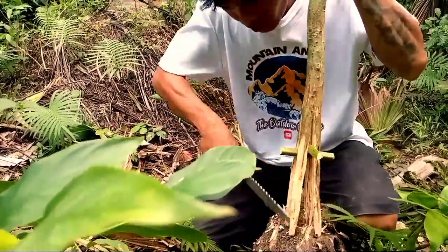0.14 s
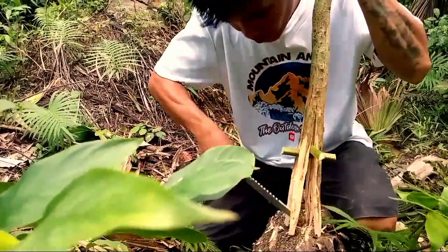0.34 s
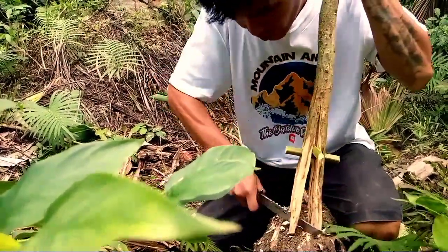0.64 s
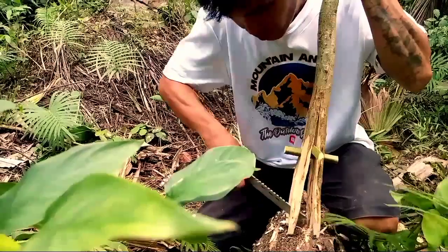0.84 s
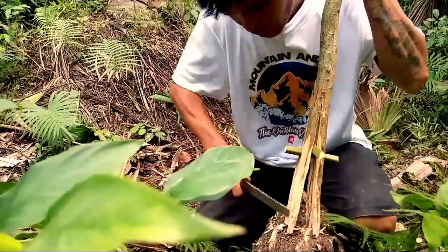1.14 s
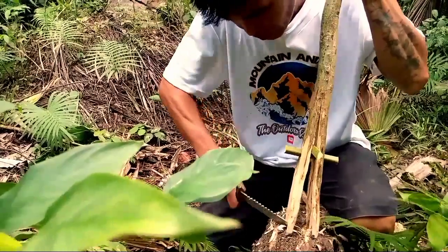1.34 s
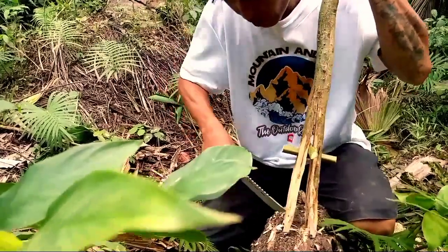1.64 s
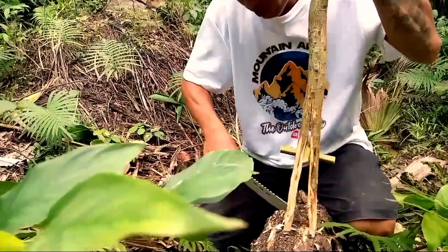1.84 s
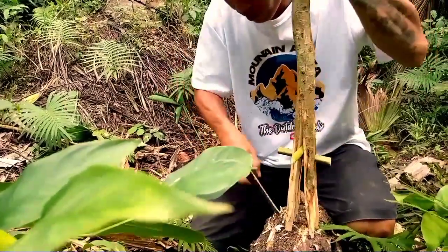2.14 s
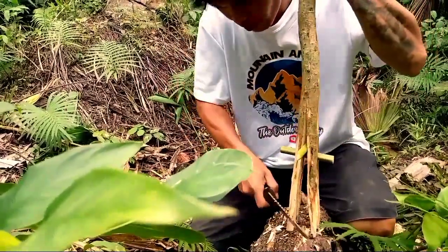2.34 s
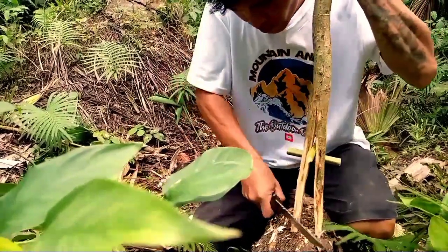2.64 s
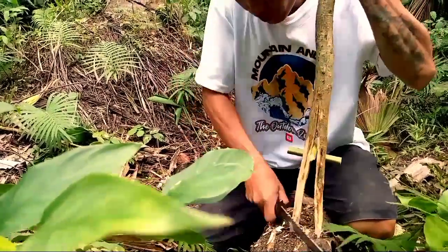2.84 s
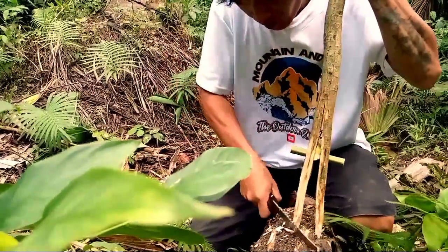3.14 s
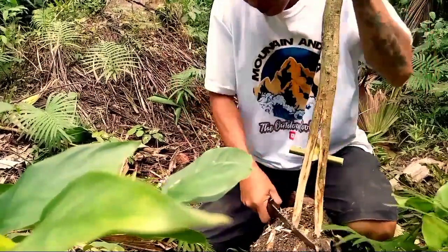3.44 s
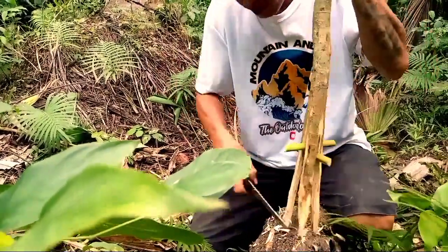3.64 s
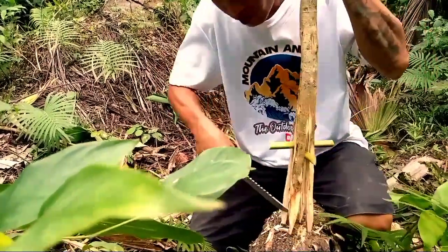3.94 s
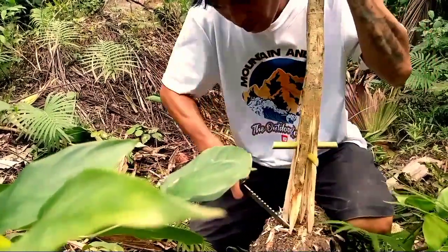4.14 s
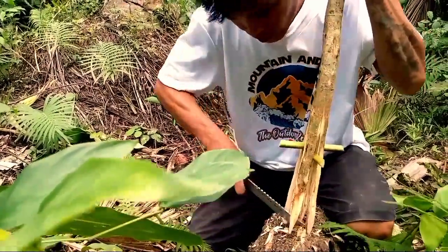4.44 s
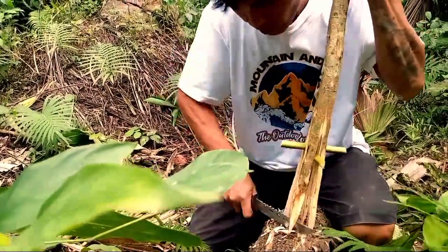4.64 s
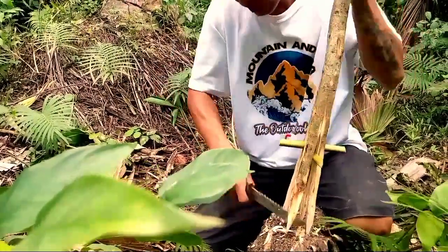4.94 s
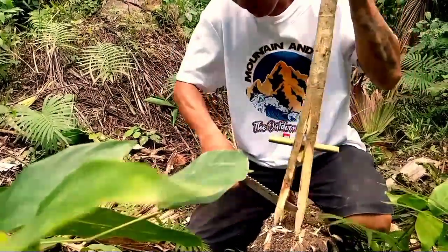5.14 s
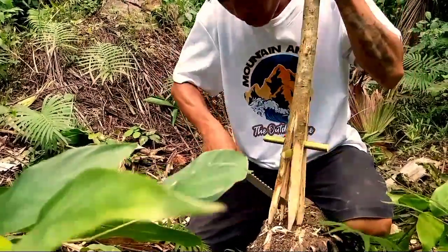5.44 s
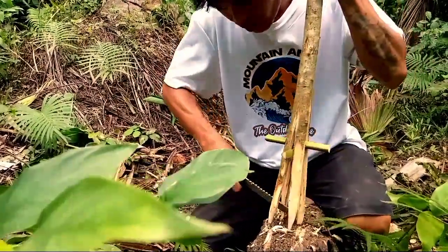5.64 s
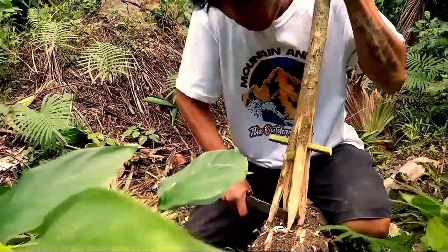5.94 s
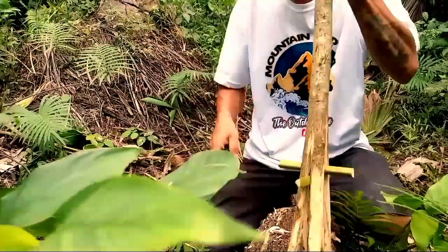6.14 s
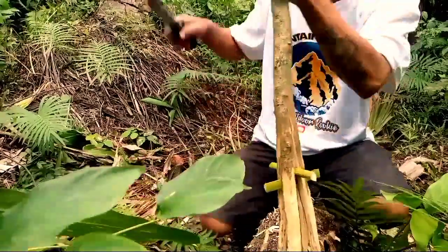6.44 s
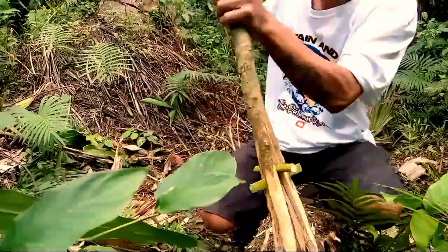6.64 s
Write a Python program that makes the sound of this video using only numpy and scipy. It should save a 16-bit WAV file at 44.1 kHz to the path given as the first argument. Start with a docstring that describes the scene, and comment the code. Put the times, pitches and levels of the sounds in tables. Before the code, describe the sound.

A quiet forest bed of soft, even hiss with a faint, wavering low drone runs for nearly seven seconds. Close by, a knife works a split cane pole. A dull, weak knock comes at 0.2 s, then a scrape and a dry snap at 0.6. A bright steel clink and crack follow at 0.95, and the strongest cluster, a hard crack with clink and hollow knock, at 1.34. A crisp snap lands at 1.93, a crackling slip at 2.74, and a double metallic clink at 3.15. A quieter stretch holds light scraping and tiny ticks, with a soft rustle at 4.1 and a muted knock at 4.57. A very sharp bare snap cuts in at 5.07; a clinking crack with a woody thump follows at 5.85. From 6.3 a brief leaf swish gives way to low wind rumble and buffets, with a last small snap at 6.76.

```python
"""A knife is worked between the split prongs of a bamboo pole by a kneeling man in a quiet forest.
Noisy scrapes swell until the edge slips: dying sines make the steel clink, short noise bursts crack and
snap the cane, and low hollow modes knock as the pole is jolted on its stump. Faint random ticks, a short
echo and soft swishes of leaves and soil surround the work. Behind lie shaped-noise forest hiss and a
wavering narrow-band drone; at the end low noise and short sine pulses buffet the microphone."""
import sys
import numpy as np
from scipy import signal
from scipy.fft import rfft, irfft
from scipy.io import wavfile
from scipy.ndimage import uniform_filter1d

SR = 44100
rng = np.random.default_rng(int(sys.argv[2]) if len(sys.argv) > 2 else 0)


def materialize(psi):
    """Save the field psi as 16-bit PCM at rate SR to the path in sys.argv[1].

    A 1-D psi becomes a single channel; in a 2-D psi each row is a channel.
    """
    bounded = np.clip(np.atleast_2d(psi).T, -1, 1)
    quanta = np.round(bounded * 32767).astype(np.int16)
    wavfile.write(sys.argv[1], SR, quanta)


N = 299439
TIME = np.arange(N) / SR


def amp(db):
    """Decibels to gain."""
    return 10 ** (np.asarray(db) / 20)


def unit(x):
    """Scales to an rms of one."""
    return x / np.sqrt(np.mean(x ** 2) + 1e-20)


def read(points, hz):
    """A spectrum in dB, joined by straight lines over log frequency."""
    point_hz, point_db = np.transpose(points)
    return np.interp(np.log(hz + 1), np.log(point_hz), point_db)


def add(mix, start_s, sound):
    """Mixes a sound in at a time, cut off at the end of the scene."""
    part = mix[max(round(start_s * SR), 0):][:len(sound)]
    part += sound[:len(part)]


def colour(x, gain):
    """Filters by a gain given as a function of frequency."""
    return irfft(rfft(x) * gain(np.fft.rfftfreq(len(x), 1 / SR)), len(x))


def drift(rate_hz):
    """Slow random motion of unit rms: noise rolled off smoothly around a rate."""
    return unit(colour(rng.standard_normal(N), lambda hz: np.exp(-(hz / rate_hz) ** 2)))


# Spectral shape of the foliage hiss. Each row: frequency in Hz, relative density in dB per Hz.
FOREST_SHAPE = [(20, -40), (30, -28), (45, -18), (85, 0.5), (130, 3.5), (280, 4), (500, -0.5), (1200, 0),
                (3000, -3), (6700, -4.5), (8100, -12), (9700, -5), (11800, -16), (13900, -24), (15100, -10)]


def forest(start_db=-58, swell_db_per_s=0.2264, flutter_db=0.75, patchy_db=1.23, top_hz=15550):
    """The even hiss of distant foliage: shaped noise that grows very slowly and flutters in drifting patches."""
    hz, _, bins = signal.stft(rng.standard_normal(N), SR, nperseg=2048)
    patches = uniform_filter1d(rng.standard_normal(bins.shape), size=14, axis=0)  # smooth over frequency
    patches = unit(uniform_filter1d(patches, size=3, axis=1))  # and over time
    ceiling = np.clip((top_hz - hz) / 100, 0, 1)
    bins = bins * ceiling[:, None] * amp(read(FOREST_SHAPE, hz)[:, None] + patchy_db * patches)
    hiss = unit(signal.istft(bins, nperseg=2048)[1][:N])
    return hiss * amp(start_db + swell_db_per_s * TIME + flutter_db * drift(16))


# Slow course of the drone. Each row: time in seconds, level in dB before trim and surges.
DRONE_LEVEL = [(0, -65), (1.85, -64), (2.15, -69.5), (2.7, -62), (4.5, -71), (4.72, -61), (6.79, -65)]
# Brief surges of the drone. Each row: centre in seconds, added level in dB.
DRONE_SURGES = [(.22, 7.5), (.97, 10.5), (1.85, 6.5), (3.25, 6.5), (5.33, 3.5)]


def drone(centre_hz=203, width_hz=29, trim_db=.3, envelope_power=1.2, surge_s=0.054):
    """A far, low drone: narrow-band noise wavers in pitch and strength, with a few brief surges."""
    noise = rng.standard_normal(N)
    narrow = colour(noise, lambda hz: 1 / (1 + ((hz - centre_hz) / width_hz) ** 2) ** 2)
    band = signal.hilbert(narrow)
    # a power above one exaggerates the natural swells of the band
    tone = unit(band.real * (abs(band) + 1e-9) ** (envelope_power - 1))
    surge_db = sum(db * np.exp(-((TIME - s) / surge_s) ** 2) for s, db in DRONE_SURGES)
    slow_db = np.interp(TIME, *np.transpose(DRONE_LEVEL))
    return amp(trim_db + surge_db + slow_db) * tone


def ring(modes, rise_s=0.00013, bend=0, bend_s=0.0075, scatter=0, size=8192):
    """Dying sines (Hz, dB, t60) that may start sharp or out of step; the grip shifts each slightly per blow."""
    t = np.arange(size) / SR
    bent_t = t + bend * bend_s * (1 - np.exp(-t / bend_s))  # pitch starts sharp by the share "bend"
    out = np.zeros(size)
    for hz, db, t60 in modes:
        blow_hz = hz * (1 + 0.001 * rng.standard_normal())
        cycles = blow_hz * bent_t + scatter * rng.random()
        out += amp(db - 60 * t / t60) * np.sin(2 * np.pi * cycles)
    return out * (1 - np.exp(-t / rise_s))


# Modes of the hollow pole. Each row: frequency in Hz before the grip, relative level in dB, t60 in seconds.
POLE_MODES = [(199, -26, 0.062), (288, -5.5, 0.057), (396, -0.5, 0.064), (460, -9, .045), (800, -1, 0.03),
              (1097, -0.5, 0.022), (1396, -3, .026), (2060, -11, 0.035)]
# Jolts of the pole on its stump. Each row: start in seconds, level in dB before the trim,
# brightness in dB per octave, factor on the mode frequencies from the grip.
POLE_KNOCKS = [(.197, -61, -13, 1), (.615, -57.5, -7, 1.4), (0.9455, -49.5, -1.5, .95),
               (1.3395, -39, 1.5, 1.03), (2.744, -50, 0, 1.12), (4.57, -51, -5, .98),
               (5.85, -41.5, -5.5, 1.09)]


def pole(trim_db=1, lowest_hz=110):
    """Short hollow knocks: brightness tilts the modes about 600 Hz, and the thin pole radiates no deep bass."""
    out = np.zeros(N)
    for s, db, tilt_db, grip in POLE_KNOCKS:
        modes = [(hz * grip, mode_db + tilt_db * np.log2(hz / 600), t60) for hz, mode_db, t60 in POLE_MODES]
        add(out, s, amp(db + trim_db) * ring(modes, rise_s=.0006, scatter=0.94))
    return colour(out, lambda hz: hz ** 2 / (hz ** 2 + lowest_hz ** 2))


# Colour of cracking bamboo before tilt and splinter. Each row: frequency in Hz, relative level in dB.
CRACK_COLOUR = [(60, -33), (300, -21), (900, -17), (1800, -9), (2800, -5.5), (4100, -4.5), (5000, -4.5),
                (6400, -0.5), (7900, -8.5), (9600, -1.5), (11000, -3), (12200, -14), (14000, -6.5),
                (15200, -6.5), (15800, -24)]


def cane(x, tilt_db, splinter_hz, splinter_db=11, width_hz=230, size=1024):
    """The causal colour of cracking bamboo, tilted about 5 kHz, with the resonance of the loosened splinter."""
    hz = abs(np.fft.fftfreq(size, 1 / SR))
    peak_db = splinter_db / (1 + ((hz - splinter_hz) / width_hz) ** 2)
    slope_db = tilt_db * np.log2(np.clip(hz, 1200, 15000) / 5000)
    gain = amp(read(CRACK_COLOUR, hz) + slope_db + peak_db)
    # minimum phase: the energy comes as early as the spectrum allows
    spectrum = np.exp(signal.hilbert(np.log(unit(gain))).conj())
    taps = np.fft.ifft(spectrum).real
    return signal.fftconvolve(x, taps[:size // 2])[:len(x)]


def crack(db, tilt_db, splinter_hz, click=4.46, tear_db=-19, tear_t60=0.061, size=4096):
    """One sharp break, then a quickly thinning noise spray of tearing fibres."""
    t = np.arange(size) / SR
    t60 = 0.023 * np.exp(-0.03 * tilt_db)  # the brighter a crack, the sooner it is over
    spray = rng.standard_normal(size) * (amp(-60 * t / t60) + amp(tear_db - 60 * t / tear_t60))
    spray[0] = click
    return amp(db) * cane(spray, tilt_db, splinter_hz)


def ticks(per_s=3, tick_db=-60, spread_db=2, tilt_db=-2, splinter_hz=5500):
    """The strained cane ticks faintly at random: small cracks of uneven level, splinter within an octave."""
    out = np.zeros(N)
    draws = rng.random((40, 3))
    starts = np.cumsum(-np.log(1 - draws[:, 0]) / per_s)
    for s, (_, strength, pitch) in zip(starts, draws):
        db = tick_db + spread_db * (2 * strength - 1)
        add(out, s, crack(db, tilt_db, splinter_hz * 2 ** (2 * pitch - 1)))
    return out


# Pushes of the edge along the cane. Each row: slip in seconds, level there in dB before the trim,
# build-up time constant in seconds.
SCRAPE_STROKES = [(.612, -56, .03), (1.335, -63.5, 0.51), (2.74, -51, 0.035), (3.17, -54.5, 0.13),
                  (3.6, -59.5, 0.11), (4.58, -55.5, 0.083), (5.075, -57, 0.097), (5.35, -63, 0.089),
                  (5.87, -56.5, 0.12), (6.36, -63.5, 0.23)]


def scrape(grains_per_s=3000, spread_db=-2.0, tilt_db=-2, trim_db=-1, let_go_s=0.031):
    """The edge catches on many tiny fibres of uneven size, louder until it slips, then dying away."""
    catches = rng.random(N) < grains_per_s / SR
    unevenness = amp(spread_db * np.minimum(rng.exponential(1, N), 5))
    grains = catches * rng.standard_normal(N) * unevenness
    pressure = np.zeros(N)
    for s, db, build_s in SCRAPE_STROKES:
        pressure += amp(db) * np.exp(-np.maximum((s - TIME) / build_s, (TIME - s) / let_go_s))
    return amp(trim_db) * pressure * unit(cane(grains, tilt_db, splinter_hz=6200, splinter_db=6))


# Fibres that snap without steel. Each row: start in seconds, crack level in dB,
# brightness in dB per octave, splinter resonance in Hz.
FIBRE_SNAPS = [(0.612, -39, 8, 6250), (0.6195, -34, 0, 9130), (.625, -49, -6, 5600),
               (0.9438, -41.5, -2.5, 4800), (0.9897, -47.5, -4, 9600), (1.2045, -50.5, -3, 4970),
               (1.3371, -47, -4, 1200), (1.928, -43, 0, 3820), (1.9295, -31.5, 5.5, 9800),
               (2.7372, -38.5, -1, 4280), (2.746, -38, 10, 10500), (2.7627, -49, -1, 4200),
               (2.7763, -42.5, 1, 10100), (3.146, -44, -4, 2300), (3.1665, -45, 4, 4470),
               (4.5706, -47.5, -8, 4500), (4.588, -48.5, -3, 4500), (4.7738, -48.5, -1.5, 3580),
               (5.0648, -34, 0, 4120), (5.066, -28.5, 9.5, 11400), (5.066, -40, 0, 1580),
               (5.079, -35, 2.5, 11000), (5.8491, -41, -7, 2300), (6.148, -52, -7, 3200),
               (6.756, -45.5, -1.5, 3840)]


def snaps():
    """Fibres snap: bare cracks of the cane with no ring of steel."""
    out = np.zeros(N)
    for s, db, tilt_db, splinter_hz in FIBRE_SNAPS:
        add(out, s, crack(db, tilt_db, splinter_hz))
    return out


# Slips and strikes of the blade. Each row: start in seconds, crack level in dB, brightness in dB per octave,
# splinter resonance in Hz, high ring level in dB, low ring level in dB, ring t60 in seconds before mode factors.
BLADE_STRIKES = [(.8203, -62, -3, 5700, -52, -55, 0.067), (0.9457, -33, 3.5, 9700, -26.5, -47, 0.081),
                 (0.961, -39, 3, 5900, -35, -37, 0.032), (1.243, -56, -2, 5700, -55, -57, .06),
                 (1.311, -46, -1, 5900, -58, -39.5, 0.03), (1.3391, -25.5, 4, 6400, -24.5, -32, .04),
                 (1.351, -45, -3, 6500, -35, -34.5, .03), (1.357, -44, 1, 14300, -36, -44, 0.067),
                 (1.9299, -29, 5.5, 6220, -36, -50, 0.075), (2.7448, -37, -4.5, 10100, -35, -41, 0.068),
                 (3.1497, -30.5, 3, 10400, -24.5, -38.5, 0.049),
                 (3.1747, -34.5, 3.5, 10400, -32, -44, .055), (3.183, -48, -2, 9500, -34, -46.5, 0.083),
                 (5.8524, -34, -1, 9300, -26, -36, .039), (5.855, -35.5, 4, 3400, -25.5, -42, .039),
                 (5.869, -52, 6, 6000, -40, -46, 0.11)]
# High steel modes. Each row: frequency in Hz, relative level in dB, factor on the ring time.
HIGH_STEEL = [(10310, -4, 1.05), (10300, -3, .7), (8960, -32, 0.57), (13060, -24, 1.1), (15200, -20, 0.87)]
# Low steel modes. Each row: settled frequency in Hz, relative level in dB, factor on the ring time.
LOW_STEEL = [(5620, -1, 0.98), (5560, -3, 1.5), (5750, -15, 0.5), (6300, -21, 0.55)]


def knife(choke_s=.001):
    """Each slip cracks the cane and rings the blade, until the cane damps it or the next contact stops it."""
    out = np.zeros(N)
    next_contact = [row[0] for row in BLADE_STRIKES[1:]] + [N / SR]
    for row, stop in zip(BLADE_STRIKES, next_contact):
        s, crack_db, tilt_db, splinter_hz, high_db, low_db, ring_t60 = row
        add(out, s, crack(crack_db, tilt_db, splinter_hz))
        # pressure of the cane sharpens the low ring at first
        for modes, ring_db, bend in (HIGH_STEEL, high_db, 0), (LOW_STEEL, low_db, 0.035):
            steel = ring([(hz, db, ring_t60 * factor) for hz, db, factor in modes], bend=bend)
            free = np.clip((stop - s - TIME[:len(steel)]) / choke_s + .5, 0, 1)
            add(out, s, amp(ring_db) * steel * free)
    return out


def undergrowth(x, echo_db=-15, t60=0.092, size=6000):
    """Ground, body and leaves scatter a faint, short echo: sparse random reflections that die away."""
    t = np.arange(size) / SR
    reflections = rng.choice([-1., 1.], size) * (rng.random(size) < 2500 / SR)
    taps = reflections * (t > .002) * amp(-60 * t / t60)
    return x + amp(echo_db) * signal.fftconvolve(x, taps / np.linalg.norm(taps))[:N]


# Brushes of leaves and soil as the man shifts. Each row: centre in seconds, level at the centre in dB,
# band centre in Hz, half length in seconds.
LEAF_RUSTLES = [(4.126, -60.5, 250, 0.045), (5.369, -62, 400, 0.026), (6.333, -59.5, 1210, 0.031),
                (6.685, -66.5, 290, 0.056)]


def rustle(octaves=0.76):
    """Soft, brief swishes of noise, each in its own band under a bell-shaped swell."""
    out = np.zeros(N)
    for s, db, centre_hz, half_s in LEAF_RUSTLES:
        noise = rng.standard_normal(16384)
        band = colour(noise, lambda hz: np.exp(-(np.log2((hz + 1) / centre_hz) / octaves) ** 2 / 2))
        t = np.arange(len(band)) / SR - len(band) / SR / 2
        add(out, s + t[0], amp(db) * unit(band) * np.exp(-(t / half_s) ** 2))
    return out


# Single buffets of air on the microphone. Each row: centre in seconds, envelope peak in dB before the trim,
# frequency in Hz.
AIR_PUFFS = [(6.45, -42.5, 73), (6.49, -43, 78.5), (6.513, -49, 105), (6.654, -40, 123), (6.693, -47, 72),
             (6.713, -42.5, 149)]


def gust(start_s=6.26, rise_s=0.16, rumble_db=-58.5, corner_hz=130, puff_trim_db=1, puff_cycles=0.91):
    """Moving air: a low noise rumble that swells and holds, with a few buffets of about a cycle or two."""
    noise = rng.standard_normal(N)
    rumble = unit(colour(noise, lambda hz: hz ** 4 / (hz ** 4 + 38 ** 4) / (1 + (hz / corner_hz) ** 4)))
    out = rumble * amp(rumble_db) * np.clip((TIME - start_s) / rise_s, 0, 1)
    for s, db, hz in AIR_PUFFS:
        cycles = hz * (TIME - s)
        bell = np.exp(-(cycles / puff_cycles) ** 2)
        out += amp(db + puff_trim_db) * bell * np.sin(2 * np.pi * (cycles + rng.random()))
    return out


def scene():
    """Everything reaches one microphone, alike in both channels; only the work on the pole is echoed."""
    background = forest() + drone()
    work = pole() + ticks() + scrape() + snaps() + knife()
    mono = background + undergrowth(work) + rustle() + gust()
    return np.array([mono, mono])


def record(dry, edge_hz=16500):
    """The recorder's band limit: a steep low-pass."""
    low_pass = signal.firwin(301, edge_hz, window=("kaiser", 9), fs=SR)
    return signal.oaconvolve(dry, low_pass[None], "same")


dry = scene()
out = record(dry)
materialize(out)
```